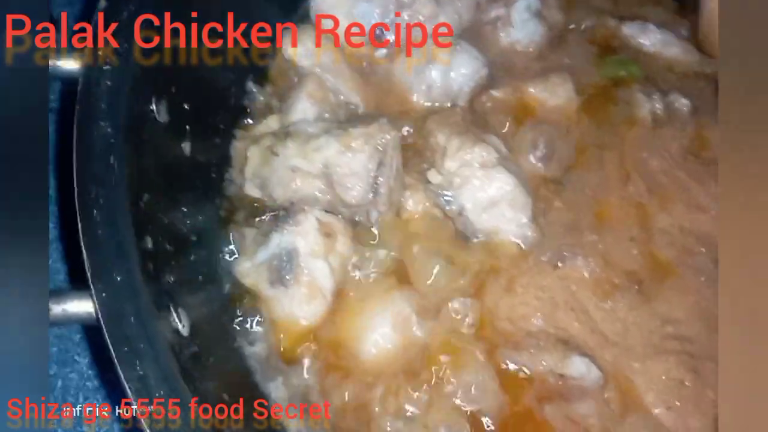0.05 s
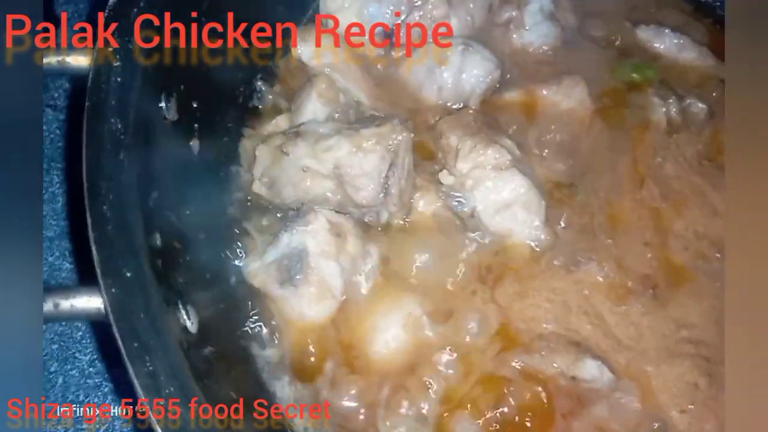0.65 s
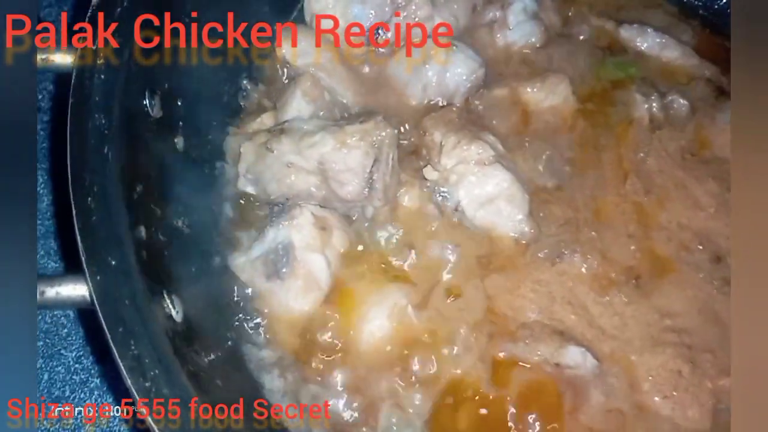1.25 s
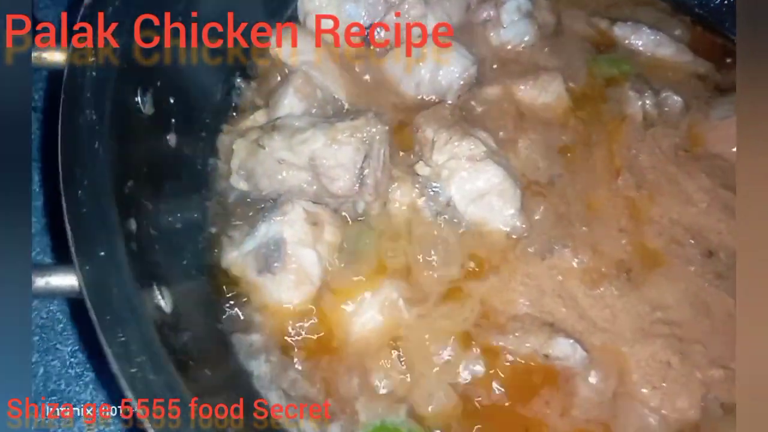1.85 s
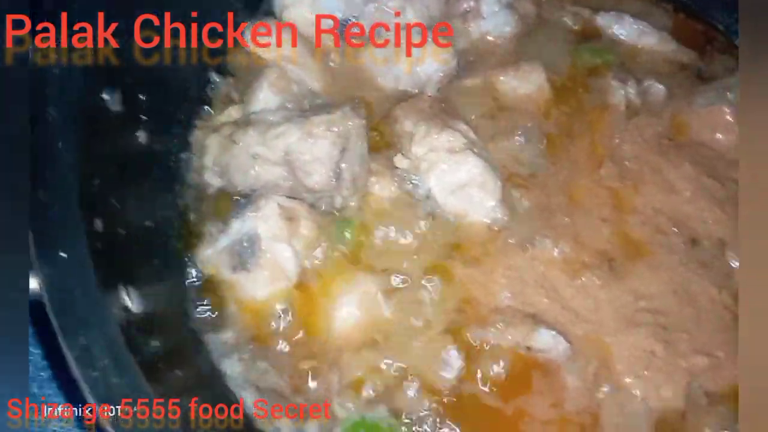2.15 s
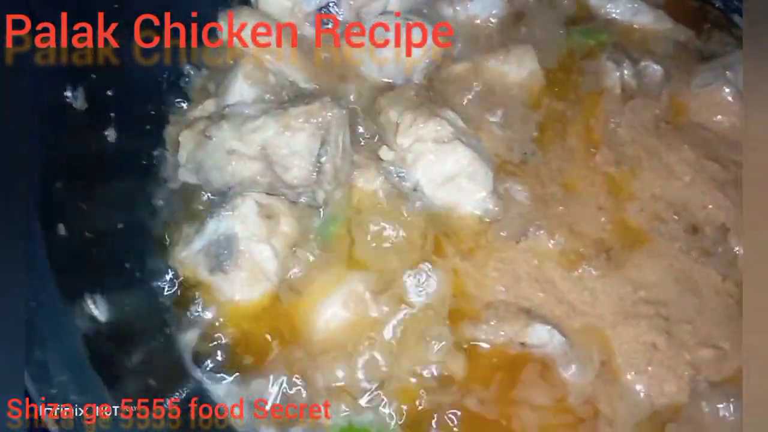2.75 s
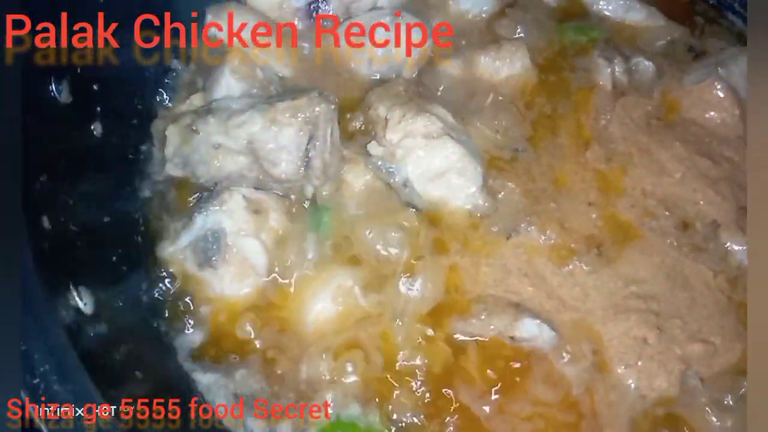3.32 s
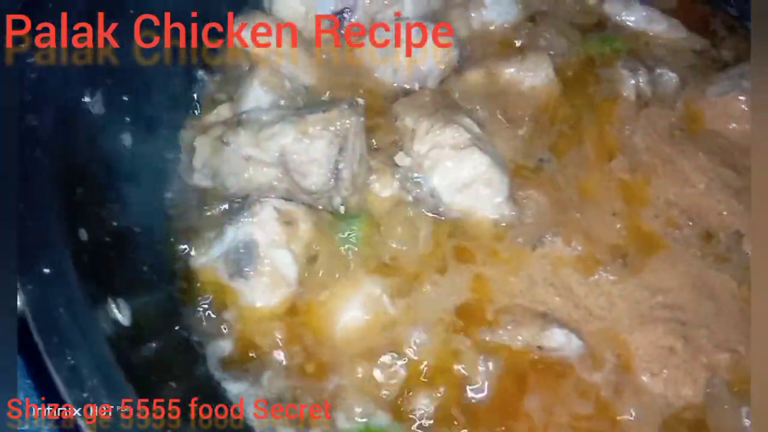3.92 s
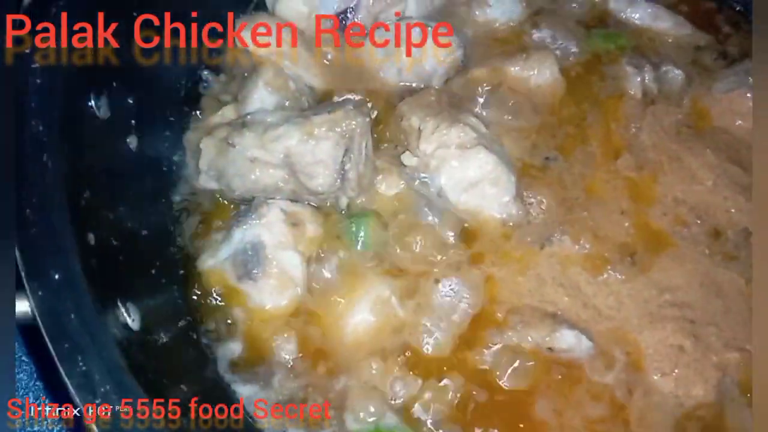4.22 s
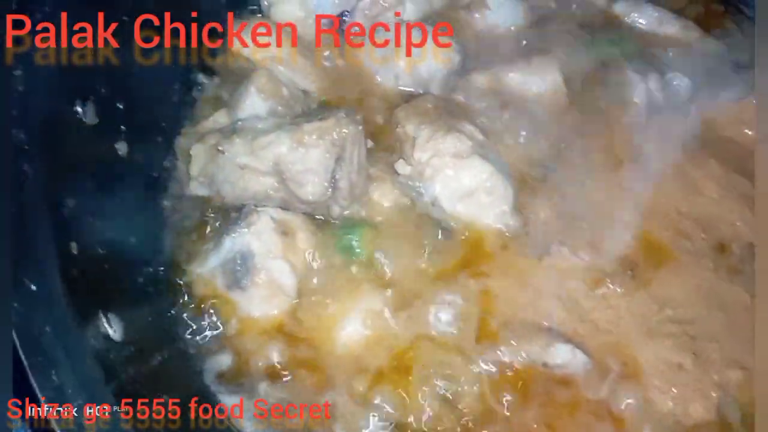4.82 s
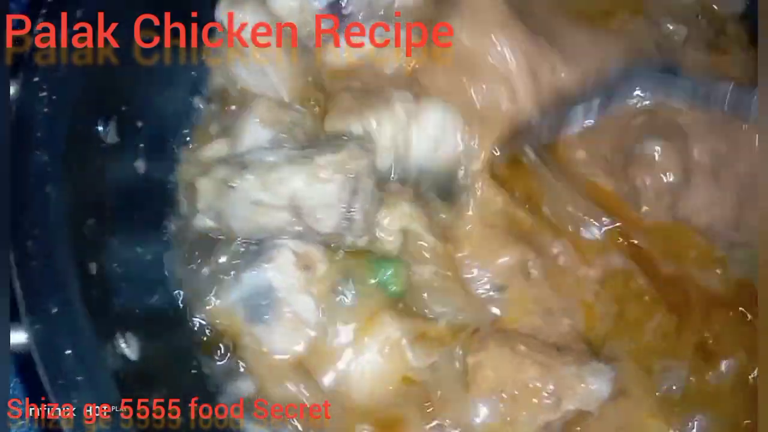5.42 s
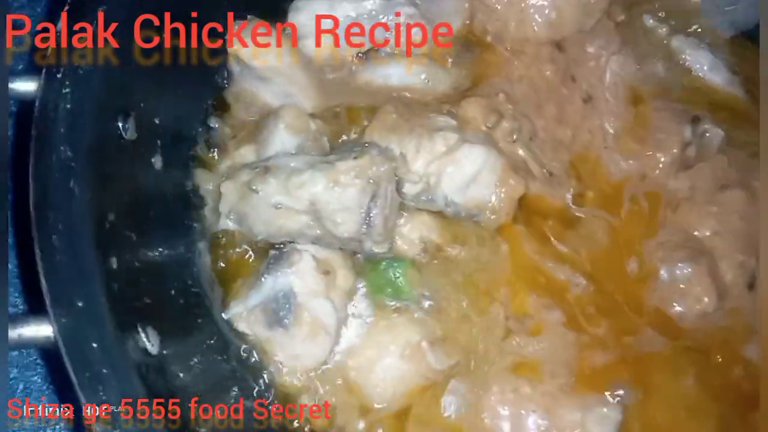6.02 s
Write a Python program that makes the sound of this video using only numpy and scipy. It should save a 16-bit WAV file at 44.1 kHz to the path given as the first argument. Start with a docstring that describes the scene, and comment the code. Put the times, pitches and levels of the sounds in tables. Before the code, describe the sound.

Heard from close above in a small, slightly echoing kitchen, a pot of chicken and gravy bubbles steadily with pops, ticks and short sizzles. A little further off, four quick, loud switch snaps bring on a faint low hum, and later comes a single hollow clack with a thump. Finally a spoon strikes the gravy and pushes through it wetly while the bubbling dies down.

```python
"""A small kitchen with hard walls, just above a pot where chicken simmers in thick gravy.
Steam bubbles ring as they open: big ones gurgle and plop, tiny ones fizz, and fat spits between them.
A switch snaps four times, an electric hum comes on, and later something knocks nearby.
Near the end a spoon squelches through the gravy and the boil calms down."""
import sys
import numpy as np
from scipy import signal
from scipy.fft import rfft, irfft
from scipy.io import wavfile
from scipy.ndimage import uniform_filter1d

SR = 44100
rng = np.random.default_rng(int(sys.argv[2]) if len(sys.argv) > 2 else 0)


def pcm_store(signal):
    """Save signal as 16-bit PCM."""
    levels = np.round(np.clip(np.atleast_2d(signal), -1, 1) * 32767)
    wavfile.write(sys.argv[1], SR, levels.astype(np.int16).T)


N = 267687
TIME = np.arange(N) / SR

# The tone of tearing gravy, and of the soft crackle under the boil. Each row: frequency in Hz, level in dB.
POP_TONE = [(250, -8), (800, -2.5), (1500, -3), (3000, 2), (6000, -6), (10000, -23.5)]
BED_TONE = [(150, -13.5), (300, -7), (480, 3), (700, 9.5), (1150, 1.5), (1900, -17.5), (3200, -12),
            (6300, 0.5), (9000, -16), (15000, -15)]
def simmer(calm_start_s=5.54, calm_db_per_s=30):
    """Steam rises in spurts of bubbles and pops, with clusters of fizz. Stirring calms the boil."""
    spurt_db = 1.8 * wander(per_s=14)
    cluster_db = 3 * wander(per_s=22)
    calm_db = -calm_db_per_s * np.maximum(TIME - calm_start_s, 0)
    gurgles = gain(-60 + spurt_db) * swarm(per_s=45, hz=(270, 580), cycles=3.5, spread_db=20.5, rise=0.13)
    plops = gain(-51 + spurt_db / 2) * swarm(per_s=90, hz=(560, 1300), cycles=4, spread_db=11, rise=0.17)
    blips = gain(-50.5 + spurt_db) * swarm(per_s=85, hz=(1300, 4000), cycles=5, spread_db=11, rise=0.17)
    fizz = gain(-46.5 + cluster_db) * swarm(per_s=190, hz=(4200, 7000), cycles=6, spread_db=14, rise=0.1)
    pops = gain(-65.5 + spurt_db) * puffs(POP_TONE, per_s=77, spread_db=0, decay_s=0.0036)
    bed = gain(-60.5 + spurt_db) * crackle(BED_TONE, per_s=4000, spread_db=9.5)
    return gain(calm_db) * (gurgles + plops + blips + fizz + pops + bed)

def bubble(hz, life_s, rise, rough=0):
    """A pocket of steam rings and climbs in pitch as it opens. Thick gravy makes the note ragged."""
    t = np.arange(int(2.5 * life_s * SR)) / SR
    envelope = (1 - np.exp(-t * hz)) * np.exp(-(t / life_s) ** 2)
    cycles = hz * t * (1 + rise * t / life_s / 2)
    slips = np.cumsum(rng.standard_normal(64))
    wobble = rough * np.interp(cycles, np.arange(len(slips)), slips)
    return envelope * np.sin(2 * np.pi * cycles + wobble)

def swarm(per_s, hz, cycles, spread_db, rise):
    """Many bubbles open at random times within a range of pitch. Most are faint, a few stand out."""
    low_hz, high_hz = hz
    out = np.zeros(N)
    for when, height, strength, life, climb, rough in rng.random((int(per_s * N / SR), 6)):
        pitch = low_hz * (high_hz / low_hz) ** height
        ring = bubble(pitch, cycles * (0.5 + life) / pitch, 2 * rise * climb, rough / 2)
        add(out, when * N / SR, gain(spread_db * (strength ** 2 - 0.5)) * ring)
    return out

# The bubbles that stand out. Each row: start in seconds, pitch in Hz, level in dB, life in vibrations.
LOUD_BUBBLES = [(0.002, 790, -41, 3.2), (0.035, 1460, -46.5, 9.9), (0.127, 3440, -37, 6.3),
                (0.151, 2160, -45, 9.9), (0.176, 600, -40, 4.6), (0.234, 6350, -34.5, 5.9),
                (0.248, 870, -38, 4.1), (0.253, 2900, -37, 4.9), (0.297, 2700, -42, 7.5),
                (0.32, 3060, -42, 7.3), (0.334, 5800, -51, 5.7), (0.469, 1346, -34.5, 7.7),
                (0.526, 2950, -36.5, 3.6), (0.5595, 4940, -38, 4.4), (0.579, 1030, -44, 6.9),
                (0.609, 2260, -41.5, 3.7), (0.702, 4480, -27.5, 1.9), (0.765, 816, -40.5, 5),
                (0.855, 4000, -36, 4.4), (0.95, 5300, -25, 1.9), (1.321, 5320, -31, 5.6),
                (1.377, 3180, -34.5, 8.6), (1.452, 5730, -33.5, 5), (1.554, 2700, -32, 4.7),
                (1.584, 6300, -32, 4), (1.607, 3480, -35.5, 3.8), (1.649, 914, -42.5, 7),
                (1.689, 5300, -37, 3.9), (1.711, 5360, -23, 3.4), (1.74, 5600, -30.5, 3.4),
                (1.747, 1820, -41.5, 10.4), (1.768, 3410, -24.5, 3.9), (1.785, 5560, -33, 4),
                (1.83, 5530, -29, 4.8), (1.869, 5950, -34.5, 4.6), (1.911, 1400, -43, 4),
                (1.955, 697, -49, 5.7), (1.984, 1045, -38, 6.4), (2.026, 1034, -40, 6.5),
                (2.069, 5700, -34, 5.3), (2.14, 2420, -35, 7.9), (2.22, 687, -45, 4.2),
                (2.244, 1010, -43, 5.9), (2.272, 4730, -36, 3.7), (2.287, 5950, -37, 4),
                (2.397, 650, -48, 5.5), (2.413, 5300, -32, 6.7), (2.455, 844, -49, 9.3),
                (2.476, 6200, -33, 7.9), (2.577, 970, -43, 6.3), (2.599, 6400, -34, 4.8),
                (2.702, 2000, -39, 7.9), (2.775, 2000, -39, 5), (2.784, 1370, -41.5, 10.4),
                (2.908, 5360, -34, 5), (2.985, 6200, -34, 6.6), (2.999, 1380, -43, 4),
                (3.181, 2220, -36, 3.8), (3.212, 2030, -37, 7), (3.268, 1430, -40.5, 5.9),
                (3.35, 2500, -37, 6), (3.361, 3750, -33, 4.3), (3.383, 2770, -42, 4.5),
                (3.395, 6300, -32, 3.5), (3.47, 3800, -37, 7.3), (3.581, 1174, -36, 8.8),
                (3.6, 5460, -32.5, 6.4), (3.639, 1088, -37.5, 8.3), (3.683, 4840, -40, 3.9),
                (3.702, 4130, -34.5, 5), (3.778, 2900, -39.5, 4), (3.807, 4710, -41, 5),
                (3.888, 1540, -42.5, 4), (3.903, 3150, -43, 6.1), (3.98, 1820, -34, 3.9),
                (4.016, 1510, -33.5, 4.4), (4.04, 2600, -38, 8), (4.079, 680, -44, 5.9),
                (4.091, 2364, -34.5, 4.3), (4.19, 6940, -27.5, 3.5), (4.2, 610, -45, 4.5),
                (4.268, 2610, -28.5, 7.1), (4.316, 5300, -39, 4.9), (4.383, 5230, -31, 3.9),
                (4.407, 5950, -34, 4), (4.438, 980, -44, 4.9), (4.467, 1220, -32.5, 2.2),
                (4.498, 2950, -38.5, 4.5), (4.567, 2770, -36, 4), (4.582, 2700, -35.5, 5.9),
                (4.624, 5700, -30, 5.6), (4.7, 1470, -46, 8.1), (4.722, 5700, -29.5, 2.9),
                (4.845, 2370, -41, 6.2), (4.855, 3960, -29, 3.5), (4.905, 6400, -40, 6.1),
                (5.426, 1190, -43, 4), (5.487, 1560, -35.5, 3.2), (5.585, 1480, -41.5, 6.4),
                (5.745, 6300, -26.5, 4.7), (5.785, 6750, -30, 3), (5.819, 3120, -40, 7.1),
                (5.894, 2100, -41.5, 8.9), (5.954, 2900, -39, 5.5), (6.014, 5700, -37, 4.2),
                (6.018, 1780, -42, 5.3), (6.053, 5270, -19.5, 1.6)]
def loud_bubbles(glide=0.0042, rough=0.34, small_cycles=5):
    """Each loud bubble bursts with a tick, rings, then splutters into up to two smaller ones."""
    out = np.zeros(N)
    t = np.arange(SR // 100) / SR
    tick = rng.standard_normal(len(t)) * np.exp(-t / 0.002)
    for start, hz, db, cycles in LOUD_BUBBLES:
        rise = glide * cycles ** 2 * rng.uniform(0.685, 1.185)  # long-lived bubbles climb further
        add(out, start, gain(db) * bubble(hz, cycles / hz, rise, rough * rng.random()))
        add(out, start, gain(db - 20) * tick * rng.choice([-1, 1]))
        for _ in range(2):
            start += rng.uniform(0, 0.0124)
            small_hz = hz * rng.uniform(1, 1.56)
            if small_hz < 7000:
                ring = bubble(small_hz, small_cycles / small_hz, glide * small_cycles ** 2, rough)
                add(out, start, gain(db - 10.5) * ring)
    return out

# Sharp ticks and cracks from the pot, including the spoon's slap and scrape.
# Each row: start in seconds, tick level in dB, crack level in dB.
POT_CRACKS = [(0.361, -44, -28), (0.6, -34, -34), (0.6488, -29, -49), (0.87, -35.5, -32),
              (0.9765, -38, -29), (1.0796, -29.5, -29), (1.1778, -24, -21), (1.4862, -41, -20),
              (2.362, -30, -49), (2.661, -31.5, -22.5), (3.294, -46, -24), (3.4705, -40, -27.5),
              (3.7015, -49, -31), (4.0943, -35, -15), (4.2323, -23, -15), (4.6285, -36, -33),
              (4.943, -24, -7), (4.9885, -45, -26.5), (5.1225, -27, -28), (5.177, -43, -28),
              (5.2183, -32.5, -14), (5.3507, -26, -25), (5.508, -34, -30), (5.5335, -35, -23),
              (5.7197, -29.5, -47), (5.868, -35, -27)]
# The tone of a sharp crack, and of a fine spray of fat. Each row: frequency in Hz, level in dB.
CRACK_TONE = [(1500, -22), (5000, -18.5), (8000, -9), (12000, 2), (15000, -7)]
SPRAY_TONE = [(4000, -21.5), (8000, -2), (10000, -2.5), (15000, -2)]
def pot_cracks():
    """Bursting films, spitting fat and the spoon tick and crack sharply over a faint spray of fat."""
    out = gain(-61.5) * puffs(SPRAY_TONE, per_s=35, spread_db=5, decay_s=0.007)
    t = np.arange(SR // 50) / SR
    tick_tone = [(200, -31.5), (700, -12), (2200, -16.5), (4300, -6.5), (6300, 5), (7500, -1.5),
                 (10000, -31)]
    for start, tick_db, crack_db in POT_CRACKS:
        bursts = rng.standard_normal((2, len(t))) * np.exp(-t / 0.0013)
        add(out, start, gain(tick_db) * unit_peak(colour(bursts[0], tick_tone)))
        add(out, start, gain(crack_db) * unit_peak(colour(bursts[1], CRACK_TONE)))
    return out

# Pockets of escaping steam. Each row: start in seconds, sputter level in dB, sizzle level in dB.
STEAM_VENTS = [(0.0, -55, -48.5), (0.103, -54, -50), (0.243, -59, -74), (0.42, -52, -55),
               (0.597, -48.5, -59), (1.478, -48.5, -49), (1.574, -52.5, -56), (1.768, -55, -62),
               (1.802, -50, -54), (1.985, -57, -49), (2.165, -59, -52.5), (2.364, -66, -46),
               (2.474, -68, -54), (2.602, -55, -50), (2.691, -57, -53), (3.292, -56, -50.5),
               (3.352, -46.5, -49), (3.521, -51, -48.5), (3.697, -49, -49), (3.957, -42, -47),
               (4.091, -45, -43), (4.192, -47.5, -50), (4.237, -51, -54), (4.379, -48, -47),
               (4.56, -53, -52.5), (4.625, -58, -53), (5.484, -44, -45.5), (5.724, -52.5, -51),
               (6.017, -51, -65)]
# The tone of the sputter, and of the sizzle. Each row: frequency in Hz, level in dB.
SPUTTER_TONE = [(400, -24.5), (900, 5.5), (1800, 3), (3500, 4.5), (6300, -12), (9000, -3.5), (15000, -5)]
SIZZLE_TONE = [(1500, -28), (3500, -19), (5000, -10), (6500, 7.5), (9000, -11.5), (15000, -12)]
def vents(decay_s=0.027):
    """Steam suddenly sputters out through the froth and sets off a sizzle of ticks and tiny bubbles."""
    ticks = crackle(SIZZLE_TONE, per_s=790, spread_db=7)
    tiny_bubbles = unit(swarm(per_s=380, hz=(3500, 7200), cycles=5, spread_db=10, rise=0.1))
    sizzle = 0.7 * (ticks + tiny_bubbles)
    sputter = crackle(SPUTTER_TONE, per_s=1500, spread_db=6)
    out = np.zeros(N)
    for start, sputter_db, sizzle_db in STEAM_VENTS:
        fade = (TIME > start) * np.exp(-np.abs(TIME - start) / decay_s)
        out += fade * (gain(sputter_db) * sputter + gain(sizzle_db) * sizzle)
    return out

# Pushes of the spoon. Each row: middle in seconds, half the length in seconds, level in dB.
SPOON_PUSHES = [(5.114, 0.087, -44), (5.278, 0.061, -46.5), (5.364, 0.066, -47.5)]
# The notes of the spoon. Each row: pitch in Hz, level in dB, seconds to fade by 60 dB.
SPOON_NOTES = [(1046, -2.5, 0.042), (4230, -5, 0.03), (5970, 1, 0.029), (7200, -4, 0.024),
               (7330, -5, 0.042)]
# The tone of the squelch, and of the wet crackle. Each row: frequency in Hz, level in dB.
SQUELCH_TONE = [(130, -8), (230, -4.5), (400, 1), (690, 0.5), (1200, 2), (1900, 1), (3000, -9), (6000, -10)]
WET_TONE = [(1500, 2.5), (3000, 2.5), (4500, 6), (6300, 11.5), (9000, -1.5), (15000, 6.5)]
def stir(in_s=4.9422, out_s=5.36):
    """A spoon slaps in, sloshes through the froth with each push, and crackles wetly until it lifts."""
    since_in, since_out = np.maximum(TIME - in_s, 0), np.maximum(TIME - out_s, 0)
    splash = gain(-30) * np.exp(-since_in / 0.0033)
    wetness = gain(-46) * np.exp(-since_out / 0.12) + splash
    effort = sum(gain(db) * np.exp(-((TIME - middle) / half) ** 2) for middle, half, db in SPOON_PUSHES)
    slips = gain(2.1 * wander(per_s=80))
    froth = 0.7 * crackle(SQUELCH_TONE, per_s=1400, spread_db=4)
    froth += 0.6 * unit(swarm(per_s=600, hz=(500, 2000), cycles=3, spread_db=6, rise=0.15))
    gap_hz = 600 + 1700 * since_in  # the gap behind the spoon rings higher as it narrows
    gap = gain(-6.5) * wander(per_s=350) * np.sin(2 * np.pi * np.cumsum(gap_hz) / SR)
    wet_crackle = wetness * crackle(WET_TONE, per_s=770, spread_db=0.5)
    out = (TIME > in_s) * slips * (effort * (froth + gap) + wet_crackle)
    slap = strike(SPOON_NOTES, crack_db=3, crack_s=0.004)
    slap_tone = [(200, -16), (550, -9), (1000, 2), (1700, -4), (3500, -8), (6000, 4)]
    add(out, in_s, gain(-21.5) * colour(slap, slap_tone))
    return out

# Snaps of the switch. Each row: start in seconds, level in dB, low body in dB, treble in dB.
SWITCH_SNAPS = [(1.0139, -18.5, 8, -6.5), (1.1067, -21, 4.5, -8), (1.2023, -13, 6.5, -2.5),
                (1.2564, -15.5, 6, -1.5)]
# The notes of its housing. Each row: pitch in Hz, level in dB, seconds to fade by 60 dB.
HOUSING_NOTES = [(242, -29, 0.056), (326, -25.5, 0.06), (774, -13.5, 0.031), (1056, -15, 0.051),
                 (1100, -10.5, 0.031), (1285, -3, 0.021), (1337, -15, 0.016), (1500, -14.5, .035),
                 (1580, -13, 0.02), (1830, -35, 0.028), (2345, -24, 0.019), (2605, -12, 0.042),
                 (3000, -6, 0.04), (3540, -10, 0.05), (3880, 0.5, 0.012), (4010, -7.5, 0.044),
                 (4110, -6, 0.026), (5920, -4, 0.022), (6350, -4, 0.013)]
def switch():
    """Each snap rattles the housing with its own mix of notes, and the metal spring inside rings on."""
    out = np.zeros(N)
    spring = note(hz=2365, db=-17.5, fade_s=0.095)
    for start, db, body_db, treble_db in SWITCH_SNAPS:
        notes = [(hz, rng.normal(note_db, 2), fade_s) for hz, note_db, fade_s in HOUSING_NOTES]
        snap = strike(notes, crack_db=-1.5, crack_s=0.0083) + spring
        tone = [(60, -8), (170, -2), (340, body_db), (520, 2.5), (1200, 3), (2400, -0.5),
                (3300, treble_db), (3900, treble_db + 5), (4700, treble_db - 0.5), (6500, treble_db),
                (12000, -11)]
        add(out, start, gain(db) * colour(snap, tone))
    return out

# The notes of the knocked thing. Each row: pitch in Hz, level in dB, seconds to fade by 60 dB.
KNOCK_NOTES = [(99.5, -16.5, 0.29), (157, -18, 0.048), (240, -9, 0.048), (580, -14, 0.015),
               (720, -12.5, 0.027), (934, -3, 0.02), (1093, -4, 0.018), (1250, -7, 0.025),
               (1493, -2, 0.011), (1730, -12.5, 0.022), (2230, -15, 0.024)]
def knock(start_s=3.0238):
    """Something is struck and gives a dull, hollow clack over a low thump."""
    out = np.zeros(N)
    clack = strike(KNOCK_NOTES, crack_db=-1, crack_s=0.012)
    tone = [(45, -19), (90, -2.5), (240, 0.5), (340, -2), (520, 4), (950, 7), (1400, 0.5), (2300, 0.5),
            (3200, -15), (6000, -17), (10000, -21)]
    add(out, start_s, gain(-13) * colour(clack, tone))
    return out

# The notes in a thin squeak. Each row: pitch in Hz, level in dB.
SQUEAK_NOTES = [(2020, -50), (3850, -53), (5910, -37.5), (8070, -40)]
def squeak(start_s=3.291):
    """A brief, thin, rough metallic squeak. Its notes borrow the short ring shape of a bubble."""
    out = np.zeros(N)
    for hz, db in SQUEAK_NOTES:
        add(out, start_s, gain(db) * bubble(hz, life_s=0.021, rise=0.004))
    return out * (0.7 + 0.55 * wander(per_s=500))

# Faint rings of the pot. Each row: start in seconds, pitch in Hz, level in dB.
POT_NOTES = [(2.246, 1720, -56), (2.363, 1945, -54), (2.703, 1810, -53), (4.269, 3165, -52)]
def pot_rings():
    """Now and then a burst leaves the pot ringing on one note."""
    out = np.zeros(N)
    for start, hz, db in POT_NOTES:
        add(out, start, note(hz, db, fade_s=0.27))
    return out

def hum(start_s=1.1, hz=100.2):
    """A wavering hum at twice the frequency of the power line comes on with the second snap."""
    fade_in = np.clip((TIME - start_s) / 0.035, 0, 1)
    level = gain(-53 + 0.85 * wander(per_s=7.7))
    phase = 2 * np.pi * hz * TIME
    return fade_in * level * (np.sin(phase) + gain(-29) * np.sin(2 * phase))

def echoes(x, delay_s, fade_s, tone):
    """Sound bounces off hard walls: dense echoes start after a delay and die away."""
    t = np.arange(SR // 2) / SR
    tail = rng.standard_normal(len(t)) * (t > delay_s) * gain(-60 * t / fade_s)
    tail /= np.sqrt(np.sum(tail ** 2))
    return colour(signal.fftconvolve(x, tail)[:N], tone)

# The notes the kitchen holds. Each row: pitch in Hz, level in dB, seconds to fade by 60 dB.
ROOM_NOTES = [(231, -3, .5), (331, 3, 0.3), (722, 7, .42), (907, -4, 0.65), (943, -1, 0.45), (1020, 0, .35),
              (1289, 7, 0.37), (3100, -5, .4), (3480, -2, 0.27), (4020, 2, 0.41)]
def kitchen(x):
    """The walls echo each sound, and waves caught between them ring on at a few pitches."""
    tone = [(100, 3.5), (250, 2), (330, 2.5), (440, 0.5), (700, -2.5), (1200, -0.5), (2400, -2.5),
            (4000, -12), (8000, -5.5)]
    # Scaled so that a note is not louder just because it rings longer.
    ringing = sum(note(hz, db, fade) * 2 * np.log(1000) / (fade * SR) for hz, db, fade in ROOM_NOTES)
    held_notes = signal.fftconvolve(x, ringing)[:N]
    return echoes(x, delay_s=0.00544, fade_s=0.46, tone=tone) + gain(-8) * held_notes

# The tone of the kitchen's background noise. Each row: frequency in Hz, level in dB.
RUMBLE_TONE = [(25, -11), (50, -18), (64, 1), (80, -10.5), (105, 3.5), (150, -3.5), (220, -25), (400, -15),
               (1000, -12), (8000, -64)]
def rumble():
    """A faint, low, steady noise fills the room."""
    return gain(-63.5) * unit(colour(rng.standard_normal(N), RUMBLE_TONE))

def note(hz, db, fade_s):
    """One pure vibration that dies away by 60 dB in fade_s seconds."""
    t = np.arange(SR // 2) / SR
    return gain(db - 60 * t / fade_s) * np.sin(2 * np.pi * hz * t)

def strike(notes, crack_db, crack_s):
    """A struck object gives a brief crack of contact and rings with its own notes."""
    t = np.arange(SR // 2) / SR
    ring = sum((-1) ** k * note(*row) for k, row in enumerate(notes))
    crack = gain(crack_db) * np.exp(-t / crack_s) * rng.standard_normal(len(t))
    return unit_peak(ring + crack)

def clicks(per_s, spread_db):
    """Clicks at random times, their sizes scattered by spread_db."""
    size = gain(spread_db * np.clip(rng.standard_normal(N), -2, 2))
    return (rng.random(N) < per_s / SR) * size * rng.choice([-1, 1], N)

def crackle(tone, per_s, spread_db):
    """Many clicks blend into a crackle with the given tone."""
    return unit(colour(clicks(per_s, spread_db), tone))

def puffs(tone, per_s, spread_db, decay_s):
    """Short puffs of noise with no pitch: each starts at once and fades."""
    envelope = signal.lfilter([1], [1, -np.exp(-1 / (decay_s * SR))], np.abs(clicks(per_s, spread_db)))
    return unit(colour(envelope * rng.standard_normal(N), tone))

def wander(per_s):
    """A smooth random curve of typical size 1 that turns about per_s times a second."""
    hold = int(SR / per_s)
    steps = np.repeat(rng.standard_normal(N // hold + 1), hold)[:N]
    return unit(uniform_filter1d(steps, hold))

def colour(x, tone, size=4096):
    """Filter a sound to follow a tone, given as pairs of frequency in Hz and level in dB."""
    hz, db = np.transpose(tone)
    bins = np.maximum(np.arange(size // 2 + 1) * SR / size, 1)
    cepstrum = irfft(np.log(gain(np.interp(np.log(bins), np.log(hz), db))))
    # Folding makes the filter ring only after a sound, never before it.
    cepstrum[1:size // 2] *= 2
    cepstrum[size // 2 + 1:] = 0
    return signal.fftconvolve(x, irfft(np.exp(rfft(cepstrum))))[:len(x)]

def gain(db):
    """Turn decibels into a number to multiply by."""
    return 10 ** (np.asarray(db) / 20)

def unit(x):
    """Scale a sound to an average (rms) level of 1."""
    return x / np.sqrt(np.mean(x ** 2))

def unit_peak(x):
    """Scale a sound so its highest peak is 1."""
    return x / np.abs(x).max()

def add(out, start_s, sound):
    """Mix a sound in at a given time."""
    start = int(np.clip(start_s * SR, 0, N))
    out[start:start + len(sound)] += sound[:N - start]

def scene():
    """The close pot echoes in its own wall. The switch and knock are further off, with more room echo."""
    pot = simmer() + loud_bubbles() + pot_cracks() + vents() + pot_rings() + squeak() + stir()
    pot += gain(-8) * echoes(pot, delay_s=0.0012, fade_s=0.045, tone=[(300, 4), (800, 2), (7000, 0)])
    further_off = switch() + knock()
    room = kitchen(gain(-9) * pot + gain(1) * further_off)
    return (pot + further_off + room + rumble() + hum())[None]

# How strongly the microphone picks up each frequency. Each row: frequency in Hz, level in dB.
MICROPHONE_TONE = [(25, -19), (45, 4.5), (62, 3.5), (6700, 3), (7800, -2.5), (9300, -14.5), (11500, -28.5),
                   (13500, -32), (15200, -21), (16000, -29)]
def record(dry, top_hz=15800):
    """The microphone dulls the sound above 7 kHz, and the very top is cut off."""
    top_cut = signal.ellip(10, 0.2, 70, top_hz, fs=SR, output="sos")
    return signal.sosfilt(top_cut, colour(dry[0], MICROPHONE_TONE))[None]

dry = scene()
out = record(dry)
pcm_store(out)
```